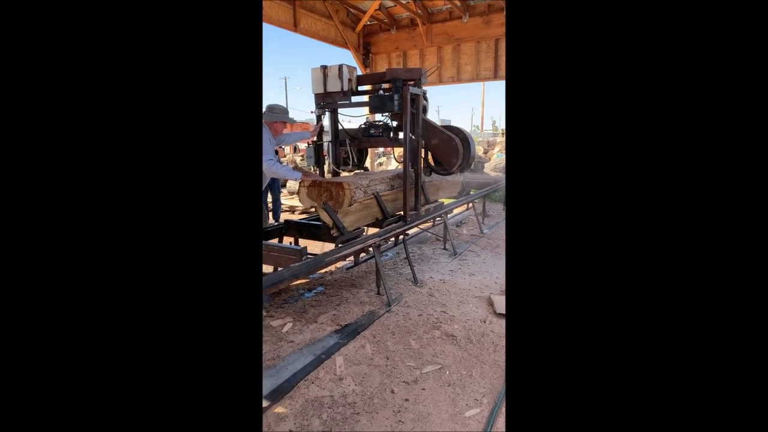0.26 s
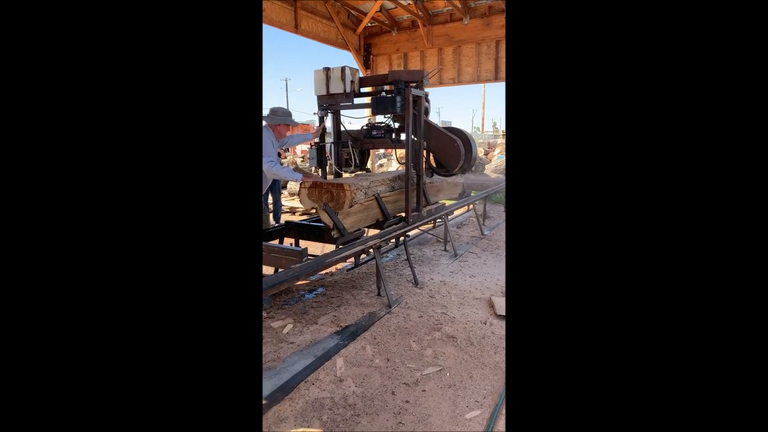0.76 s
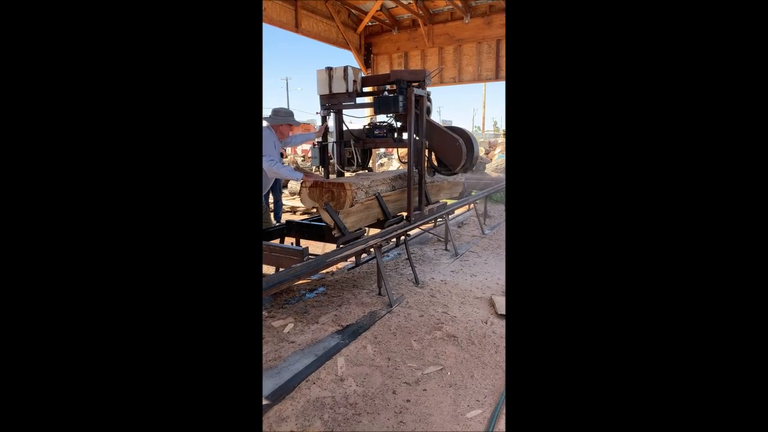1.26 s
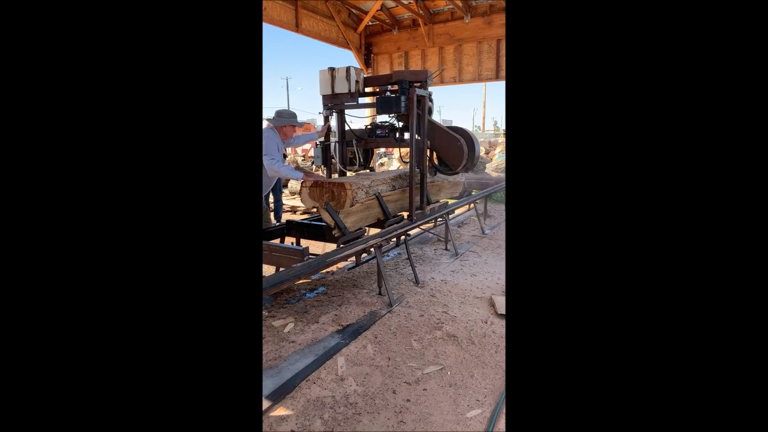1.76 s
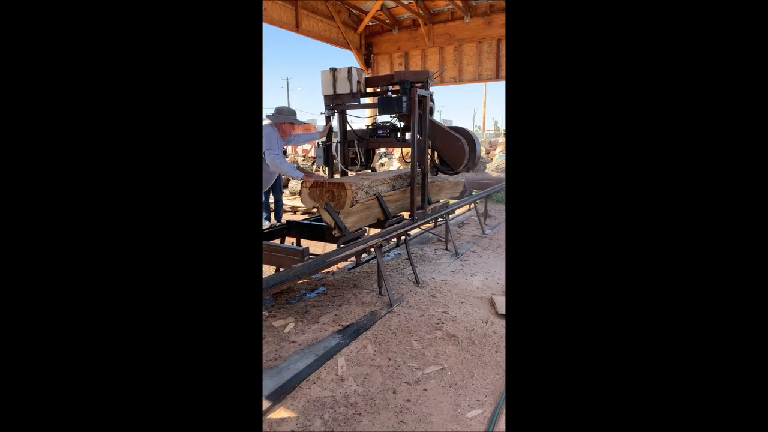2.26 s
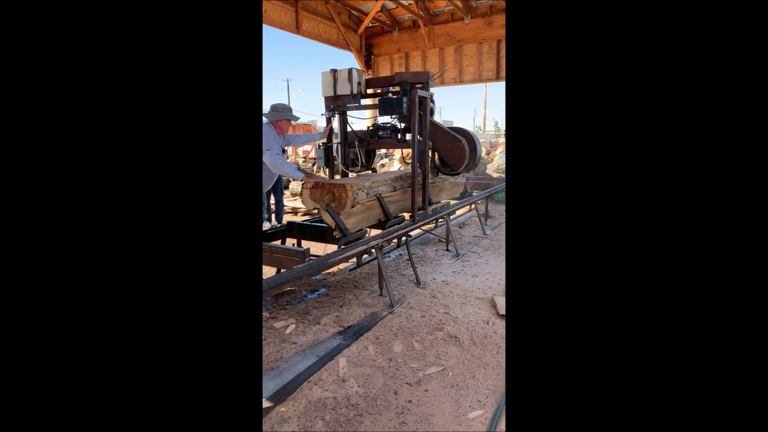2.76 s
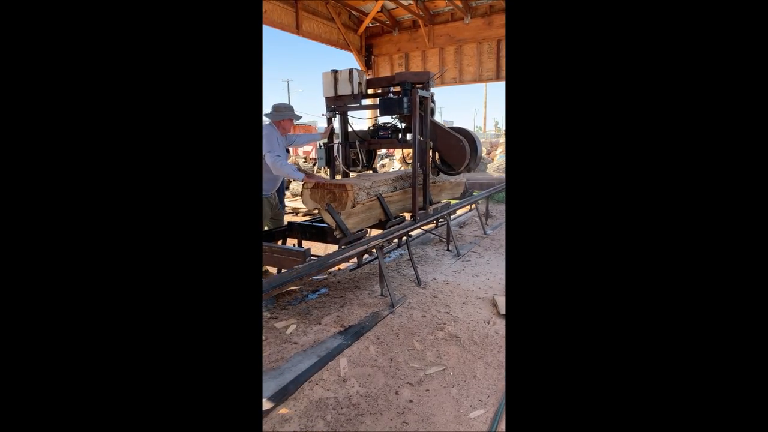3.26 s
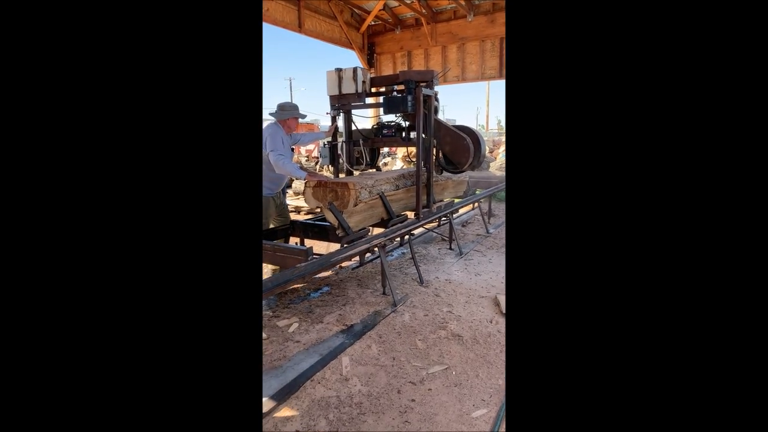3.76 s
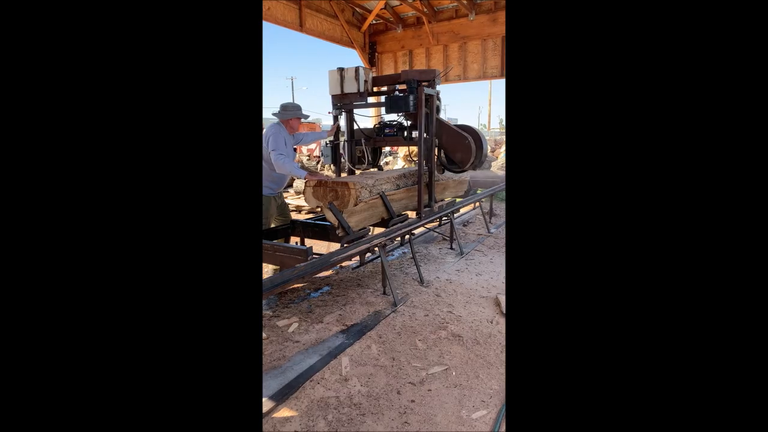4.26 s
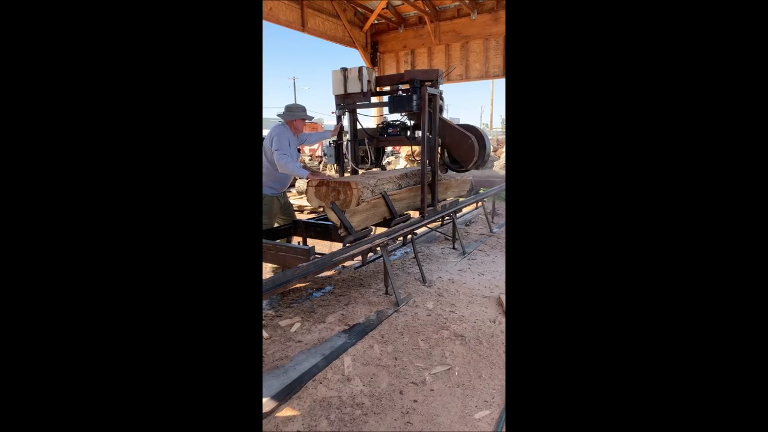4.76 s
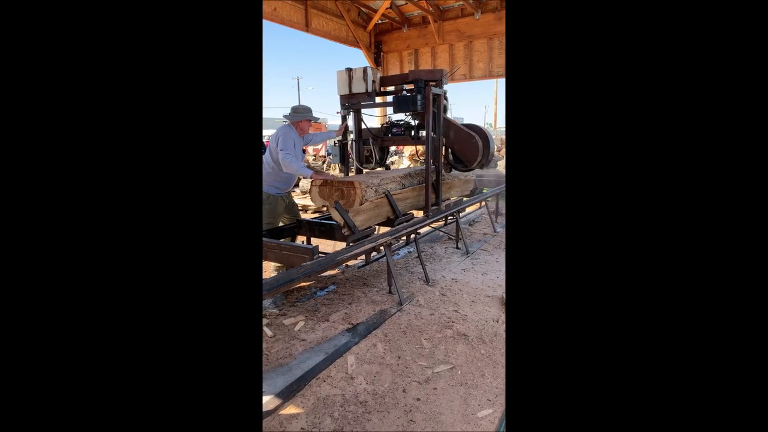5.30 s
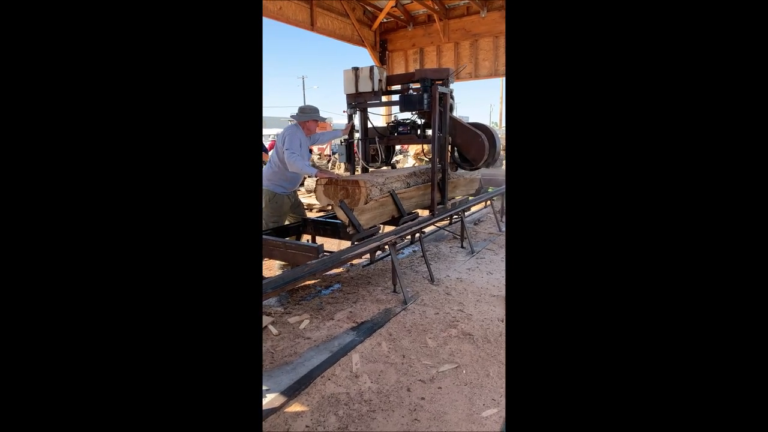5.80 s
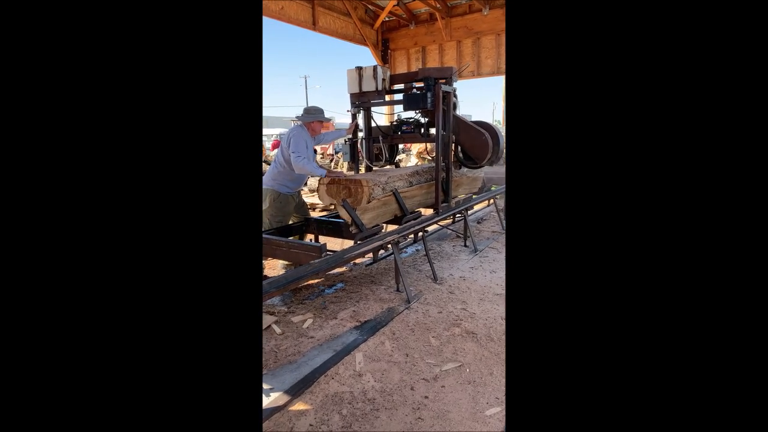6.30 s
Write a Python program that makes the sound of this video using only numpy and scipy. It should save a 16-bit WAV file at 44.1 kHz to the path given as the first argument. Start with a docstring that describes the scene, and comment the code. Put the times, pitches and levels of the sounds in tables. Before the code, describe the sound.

Already running at full level, a portable band sawmill drones with a rough twin-cylinder engine, its low buzzing note fluttering about 27 times a second. Broad mechanical roar and loose panel rattle surround it, topped by a bright, grainy hiss of blade teeth in wood, jerked by uneven firings. From 0 to 2 seconds the pitch slowly sags and the hiss softens slightly. At about 2.2 seconds the engine surges, barking harder, and holds its highest speed from 2.6 to 3.1 while the hiss becomes thinner and duller, with a tiny spit near 3.0. Around 3.25 the blade bites again: hiss returns, the bark briefly chokes, a panel rings and pitch drops by 3.5. It climbs gently to 4.6, dips near 5, rises to 5.6, then sinks until the abrupt end at 6.5. Fixed outdoor perspective, wide stereo, no clear echo.

```python
"""A twin-cylinder engine drones and hunts in speed on a portable band sawmill under an open shed.
Its note is a sum of locked multiples of the engine cycle. The blade, filtered noise with ringing
bands, hisses through a log over the roar of the machine. The feed eases for a moment, the engine runs
up and the hiss thins. The distance stays fixed: levels are those at the microphone. In stereo, the
treble reaches the right channel later and turned over in polarity."""
import sys
import numpy as np
from scipy import signal
from scipy.fft import rfft, irfft
from scipy.io import wavfile
from scipy.ndimage import uniform_filter1d

SR = 44100
rng = np.random.default_rng(int(sys.argv[2]) if len(sys.argv) > 2 else 0)


def wav_record(signal):
    """Record a signal, one row per channel, as 16-bit PCM in the file named by sys.argv[1]."""
    frames = np.transpose(np.atleast_2d(signal))
    bounded = np.clip(frames, -1, 1)
    # unit amplitude maps onto the largest positive 16-bit level
    quanta = np.round(bounded * 32767).astype(np.int16)
    wavfile.write(sys.argv[1], SR, quanta)


N = 288414

# Stereo picture: (frequency [Hz], likeness [0-1], right over left [dB], phase lag of the right [turns])
STEREO_CHANNELS = [(0, .75, .8, 0), (60, .65, 1.4, -.01), (110, .65, 2.1, 0), (170, .7, 3, -.015),
                   (280, .75, 3.8, -.012), (420, .8, 2.2, 0), (520, .75, 1.2, .035), (700, .75, 2.7, .03),
                   (1100, .77, .2, .03), (1300, .76, 0, -.04), (1800, .54, 1.2, .06), (2300, .33, 2, .24),
                   (2700, .33, .3, .3), (3600, .52, -.2, .29), (4300, .78, -.2, .45), (4600, .84, 0, .5),
                   (15400, .83, 0, 3)]
# Machine roar, relative spectrum: (frequency [Hz], density [dB per Hz])
ROAR_SPECTRUM = [(15, -30), (35, -7), (60, -3), (95, -5), (150, 0.5), (180, -5.5), (205, -3), (240, .5),
                 (280, 1), (350, 2.5), (410, -1), (480, 0.5), (600, -3.5), (1000, -4.5), (1150, -7),
                 (1700, -8), (2300, -9.5), (3300, -11), (4500, -24), (9000, -20.5)]
# Panels and guards that ring in the roar: (frequency [Hz], width [Hz], level against the roar [dB])
PANEL_MODES = [(352, 14, -15), (685, 50, -17), (900, 51, -23), (1305, 98, -15.5), (2073, 48, -24),
               (2810, 16, -28)]
# Moments when one panel rings out: (time [s], panel frequency [Hz], rise [dB], half width [s])
PANEL_RINGS = [(1.02, 352, 5, .06), (1.42, 352, 5, .05), (1.62, 352, 6, .07), (2.6, 352, 6, .08),
               (3.32, 352, 9, .06), (4.05, 352, 5, .15), (3.45, 685, 3, .3), (5.6, 900, 7, .35),
               (3.97, 1305, 6, .04), (5.32, 1305, 4, .06)]
# Teeth in the wood, relative spectrum: (frequency [Hz], density [dB per Hz])
CUT_SPECTRUM = [(1500, -5), (3000, -13.5), (3700, -2), (4300, -2.5), (4750, -3), (5600, 0.5), (7000, 1),
                (7800, 0.5), (9000, 0), (10300, 0.5), (11000, -1), (11700, -6), (12500, -3), (14500, -7.5),
                (16000, -3)]
# The taut blade rings: (frequency [Hz], width [Hz], level against the hiss [dB])
BLADE_MODES = [(5000, 160, -22), (6300, 180, -24.5), (8340, 200, -16.5), (9650, 200, -16)]
# Feed: (time [s], bite of the blade [dB])
FEED_BITE = [(0, -23.5), (.7, -24.5), (1.1, -25.5), (2.2, -26), (2.4, -27), (2.6, -27.5), (2.78, -29),
             (3.16, -29.5), (3.24, -26.5), (3.7, -26), (4.45, -26), (4.7, -27), (5.1, -27.5), (5.5, -25.5),
             (5.9, -27), (6.3, -25.5), (6.54, -27.5)]
# Brief swells and dips of the noise: (time [s], blade [dB], machine [dB], half width [s])
NOISE_SWELLS = [(2.21, 1, 0.5, 0.012), (2.295, 4, 2, .03), (2.47, 2, -1.5, .01), (2.992, 5.5, -2, .006),
                (3.27, 0.5, 0, .03), (3.33, 0.5, 1.5, 0.033), (3.38, -2, 0.5, .02), (3.6, 1.5, 0.5, .037),
                (3.86, 1.5, -0.5, 0.033), (4.6, -1, 2, 0.047)]
# Engine speed: (time [s], firing cycles [Hz])
ENGINE_SPEED = [(0, 27.8), (.53, 27.8), (.69, 27.7), (.95, 27.2), (1.04, 27.2), (1.13, 27.5), (1.22, 27.5),
                (1.53, 26.7), (1.88, 26.3), (2.09, 25.5), (2.24, 26), (2.33, 26.7), (2.5, 28.9),
                (2.55, 29.4), (2.62, 29.6), (2.9, 29.9), (3.15, 29.5), (3.28, 29.1), (3.35, 28),
                (3.42, 27.3), (3.5, 26.7), (3.57, 26.6), (3.81, 26.6), (3.92, 26.8), (4.06, 27.3),
                (4.28, 27.5), (4.57, 28), (4.72, 27.9), (4.83, 27.4), (4.9, 27.2), (5.01, 27.2),
                (5.1, 27.6), (5.5, 28), (5.61, 28.3), (5.77, 27.9), (6.01, 27), (6.32, 26.4), (6.54, 26.1)]
# Engine speeds at which the exhaust levels are listed: (firing cycles [Hz])
LISTED_SPEEDS = [25.6, 26.2, 26.7, 27.3, 27.8, 28.5, 29.2, 29.8]
# Exhaust note before effort; pipe and shed favour other multiples as speed moves:
# (multiple of the cycle, rms level at each listed speed [dB] x 8, growth through the cut [dB per s])
EXHAUST_MULTIPLES = [(1, -57, -57, -54, -52, -53, -54, -57, -57, 0),
                     (2, -36, -36, -37, -40, -40, -40, -40, -41, 0),
                     (3, -30, -30, -29, -35, -37.5, -36, -35.5, -36, 0),
                     (4, -52, -52, -52, -50, -48, -48, -45, -42, 0),
                     (5, -25.5, -24.5, -26.5, -28.5, -27.5, -26.5, -29.5, -33.5, 0),
                     (6, -39, -44, -39.5, -32.5, -30, -30, -33.5, -33.5, 0),
                     (7, -44, -42, -42, -39.5, -41, -42, -48, -48, 0),
                     (8, -50, -44, -44, -49, -41, -38.5, -37, -42, 0),
                     (9, -35, -35.5, -39, -42, -35, -34, -35, -34.5, 0),
                     (10, -33, -31, -29.5, -28.5, -32, -32.5, -34, -35.5, .7),
                     (11, -38, -33, -34, -32.5, -32.5, -34, -37, -39, .25),
                     (12, -34.5, -34.5, -34.5, -36, -37.5, -41, -41, -46, 0),
                     (13, -45, -43, -35.5, -41, -41, -41, -45, -49, 0),
                     (15, -39, -39.5, -38, -37, -38, -39, -45, -50, 0)]
# Where the swing reverses, as the cylinders cancel or the pipe resonates: (multiple of the cycle)
SWING_REVERSALS = [4.5, 10.5, 12.5]
# The bark drops out as the blade bites again: (time [s], level [dB], half width [s])
BARK_CHOKE = (3.32, -12, .11)

EDGE_HZ = 15730  # upper edge of the recorded band
CLATTER_DB, USUAL_BITE_DB = -27.5, -27.5  # machine level when the blade bites as usual
CLATTER_SHARE = .45  # dB of machine clatter per dB of bite
WHEEL_TURNS, WHEEL_DB = .553, .3  # band wheel: turns per engine cycle, throb of the hiss
SECOND_FIRING = .65  # share of the cycle after the first cylinder
JOLT_SPREAD_DB = 5  # firings stray in strength by at most this, up or down
CYCLE_WANDER = .002  # share of a cycle, rms, by which the note strays
FIRST_UPPER = 8.5  # multiples above this bark, those below boom
LAST_SLOW, SLOW_S = 3.5, .045
BOOM_DB, BARK_DB = -1, -1  # offsets of lower and upper multiples at a steady speed
CHOKE_BOOM_SHARE = -.13  # the boom above LAST_SLOW swells a little during the choke
BARK_DB_PER_HZ_S, BARK_LAG_S = .46, .09  # the bark swells, with a lag, as the engine gains speed
STEADY_HZ_PER_S = 1.5  # gentler gains of speed leave the bark alone


def amp(db):
    """Decibels to gain."""
    return 10 ** (np.asarray(db) / 20)


def evened(x):
    """Scales to rms 1."""
    return x / np.sqrt(np.mean(x ** 2) + 1e-20)


def curves(rows):
    """Columns of a time table, one value a sample."""
    seconds, *columns = np.transpose(rows)
    t = np.arange(N) / SR
    return [np.interp(t, seconds, column) for column in columns]


def bump(s, db, half):
    """A bell-shaped change of level in dB around s, down to 1/e of its height at half seconds away."""
    return db * np.exp(-((np.arange(N) / SR - s) / half) ** 2)


def trailing(x, lag_s):
    """A control that follows x sluggishly, through two equal one-pole lags."""
    keep = np.exp(-1 / (lag_s * SR))
    return x[0] + signal.lfilter([(1 - keep) ** 2], [1, -2 * keep, keep ** 2], x - x[0])


def drift(hz):
    """Slow chance: rms-1 noise that rolls off steeply above hz, drawn every 64 samples."""
    count = N // 64 + 2
    roll_off = 1 + (np.fft.rfftfreq(count, 64 / SR) / hz) ** 4
    slow = irfft(rfft(rng.standard_normal(count)) / roll_off, count)
    return np.interp(np.arange(N) / 64, np.arange(count), evened(slow))


def noise(spectrum, patchy_db, flicker_db):
    """Random short-time spectra with drifting patches and a flicker shared by all pitches."""
    frames = N // 128 + 5
    real, imaginary, patches = rng.standard_normal((frames, 257, 3)).T
    patches = uniform_filter1d(patches, size=8, axis=0)  # across pitch
    patches = evened(uniform_filter1d(patches, size=14, axis=1))  # across time
    flicker = evened(uniform_filter1d(rng.standard_normal(frames), size=5))
    frame_spectra = (real + 1j * imaginary) * amp(patchy_db * patches + flicker_db * flicker)
    white = signal.istft(frame_spectra, nperseg=512, noverlap=384)[1][:N]
    f, db = np.transpose(spectrum)
    colour = amp(np.interp(np.log(np.fft.rfftfreq(N, 1 / SR) + 1), np.log(f), db))
    return evened(irfft(rfft(white) * colour, N))


def ringing(modes, swell_db):
    """Noise caught in fixed resonances, each swelling on its own."""
    hz, out = np.fft.rfftfreq(N, 1 / SR), np.zeros(N)
    for centre_hz, width_hz, db in modes:
        resonance = 1 / (1 + ((hz - centre_hz) / width_hz * 2) ** 2)
        ring = evened(irfft(rfft(rng.standard_normal(N)) * resonance, N))
        rings_db = sum(bump(s, more_db, half)
                       for s, panel_hz, more_db, half in PANEL_RINGS if panel_hz == centre_hz)
        out += amp(db + rings_db + swell_db * drift(11.0)) * ring
    return out


def work():
    """Levels of blade and machine in dB: the feed, followed in part by the clatter, and brief swells."""
    bite_db = curves(FEED_BITE)[0]
    clatter_db = CLATTER_DB + CLATTER_SHARE * (bite_db - USUAL_BITE_DB)
    for s, blade_db, machine_db, half in NOISE_SWELLS:
        bite_db = bite_db + bump(s, blade_db, half)
        clatter_db = clatter_db + bump(s, machine_db, half)
    return bite_db, clatter_db


def machine(jolts):
    """Broad roar of engine, belt and wheels, with ringing panels; each firing rattles it."""
    roar = noise(ROAR_SPECTRUM, patchy_db=1.5, flicker_db=.5) + ringing(PANEL_MODES, swell_db=2.5)
    rattle = 1 + .35 * uniform_filter1d(jolts, size=150)
    return amp(work()[1]) * roar * rattle


def blade(speed, jolts):
    """Hiss of the teeth; a light bite also dulls it, and each firing jerks the band."""
    bite_db = work()[0]
    throb_db = WHEEL_DB * np.sin(2 * np.pi * WHEEL_TURNS * np.cumsum(speed) / SR)
    hiss = noise(CUT_SPECTRUM, patchy_db=1.7, flicker_db=.9) + ringing(BLADE_MODES, swell_db=3.2)
    mellow = signal.sosfilt(signal.butter(2, 9500, "low", fs=SR, output="sos"), hiss)
    dull = np.clip((-27.5 - bite_db) * .12, 0, .45)  # share of mellow hiss
    jerked = hiss * (1 + 1.4 * jolts)
    return amp(bite_db + throb_db) * ((1 - dull) * jerked + dull * mellow)


def firings(speed):
    """Two sharp, quickly dying jolts a cycle, the second weaker, harder when load drags the speed down."""
    cycle = np.cumsum(speed) / SR - .43  # the first jolt falls midway through the sweep of the note

    def jolt(at):
        """Jumps up at this share of each cycle and dies away, to 1/e in a twentieth of a cycle."""
        return np.exp(-((cycle - at) % 1) / .05)

    load = np.clip((29.8 - speed) / 7.3, 0, 1)
    strength = amp(JOLT_SPREAD_DB * np.tanh(drift(18)))
    return load * strength * (jolt(0) + .39 * jolt(SECOND_FIRING))


def bark(speed):
    """Level of the upper multiples in dB: up while speed is gained, down for a moment at the choke."""
    gaining = trailing(np.gradient(speed) * SR, BARK_LAG_S) - STEADY_HZ_PER_S
    return BARK_DB + BARK_DB_PER_HZ_S * np.maximum(gaining, 0) + bump(*BARK_CHOKE)


def exhaust(speed):
    """Locked multiples of the engine cycle; the higher arrive later, so each cycle sweeps upward."""
    t, out = np.arange(N) / SR, np.zeros(N)
    bark_db, slow_speed, choke_db = bark(speed), trailing(speed, SLOW_S), bump(*BARK_CHOKE)
    cycle = np.cumsum(speed) / SR + CYCLE_WANDER * drift(3.6)
    for k, *dbs, grows_db in EXHAUST_MULTIPLES:
        # lag in turns; its slope, the delay, levels off near one cycle
        lag = .34 + 3.05 * np.log(np.cosh((k - 2.5) / 3.5))
        lag += .5 * np.sum(k > np.array(SWING_REVERSALS))
        if k < FIRST_UPPER:
            effort_db = BOOM_DB + CHOKE_BOOM_SHARE * (k > LAST_SLOW) * choke_db
        else:
            effort_db = bark_db
        heard_speed = slow_speed if k < LAST_SLOW else speed
        level_db = np.interp(heard_speed, LISTED_SPEEDS, dbs) + effort_db + grows_db * t
        level_db = level_db + .05 * k * drift(2.2)
        phase = 2 * np.pi * (k * cycle - lag) + .007 * k * drift(5)
        out += np.sqrt(2) * amp(level_db) * np.cos(phase)  # root 2: rms to peak
    return out


def scene():
    """Each channel has the machine and the blade partly alike, the exhaust note wholly alike."""
    speed = curves(ENGINE_SPEED)[0]
    note, jolts = exhaust(speed), firings(speed)
    first, second = (machine(jolts) + blade(speed, jolts) for _ in range(2))
    f, *columns = np.transpose(STEREO_CHANNELS)
    hz = np.fft.rfftfreq(N, 1 / SR)
    same, over_db, turns = (np.interp(hz, f, column) for column in columns)
    same = np.clip(same, 0, 1)
    left = rfft(note + first) / amp(over_db)
    right = rfft(note) + same * rfft(first) + np.sqrt(1 - same ** 2) * rfft(second)
    right = right * np.exp(-2j * np.pi * turns)
    return np.array([irfft(left, N), irfft(right, N)])


def record(dry):
    """The band limit of the microphone chain: a steep linear-phase low-pass."""
    low_pass = signal.firwin(2047, EDGE_HZ, window=("kaiser", 9), fs=SR)
    return signal.oaconvolve(dry, low_pass[None], "same")


dry = scene()
out = record(dry)
wav_record(out)
```